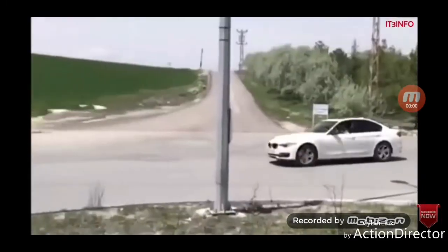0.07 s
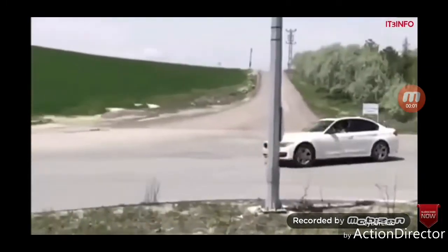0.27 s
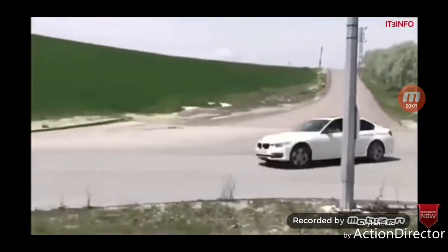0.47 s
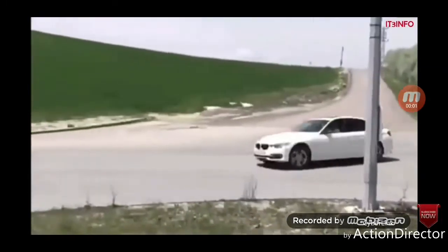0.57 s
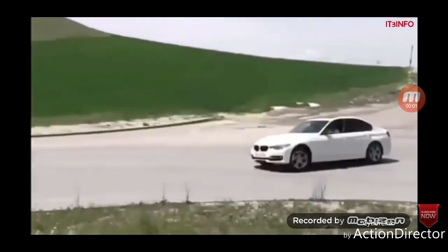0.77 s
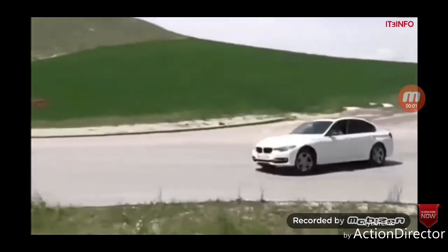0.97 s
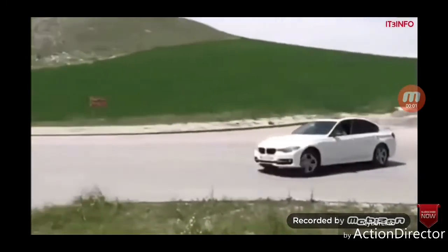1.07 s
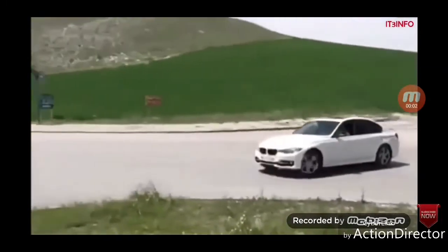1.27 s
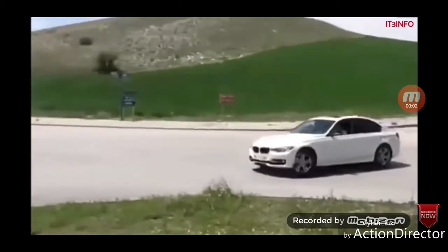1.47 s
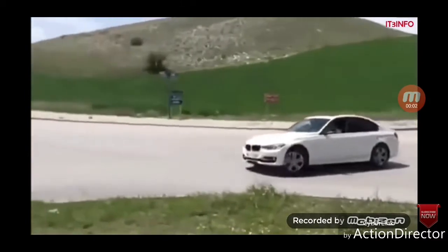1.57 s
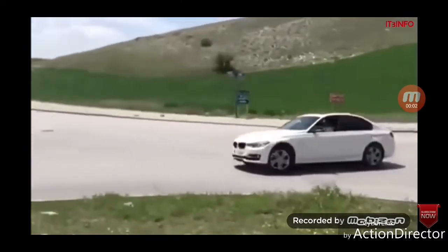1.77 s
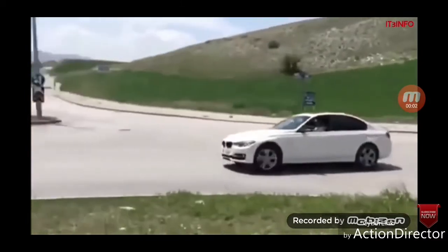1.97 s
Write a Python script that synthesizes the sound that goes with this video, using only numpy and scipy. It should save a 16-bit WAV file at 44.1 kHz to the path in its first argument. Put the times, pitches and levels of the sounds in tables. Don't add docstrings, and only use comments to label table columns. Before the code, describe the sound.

Tyres of a sliding car squeal without a break on dry asphalt, several wavering high pitches over gritty rubber scrub; outdoors, some metres from a hand-held phone, with small handling ticks, cloth rustle and low air rumble.

```python
import sys
import numpy as np
from scipy import signal
from scipy.fft import rfft, irfft
from scipy.io import wavfile
from scipy.ndimage import uniform_filter1d

SR = 44100
rng = np.random.default_rng(int(sys.argv[2]) if len(sys.argv) > 2 else 0)


def invert_db(x):
    u = np.asarray(x, float) / 20
    return 10 ** u


def wav_out(sig):
    wavfile.write(sys.argv[1], SR, np.round(np.clip(np.atleast_2d(sig).T, -1, 1) * 32767).astype(np.int16))


N = 88244

# start_s, pitch_hz, level_db
LOW_TYRE = [(0.03, 1066, -17), (0.181, 1055, 7), (0.301, 1013, -13), (0.457, 1015, 8.5), (.54, 1006, -11),
            (.75, 985, 3.5), (0.951, 999.6, -1), (1.179, 994.2, 5.5), (1.23, 923.4, -20), (1.402, 918.5, 6),
            (1.602, 902, 8), (1.702, 931.5, -12.5), (1.797, 896.6, -6), (1.899, 947, 5.5), (2, 975, 9)]
EASE_EDGE_S = 0.02


def to_rms(x, db):
    return x * invert_db(db) / np.sqrt(np.mean(x ** 2))


def colour(x, points):
    hz, db = np.array(points, float).T
    log_hz = np.log(np.arange(len(x) // 2 + 1) * SR / len(x) + 1)
    return irfft(rfft(x) * invert_db(np.interp(log_hz, np.log(hz), db)), len(x))


def noise(points, db):
    return to_rms(colour(rng.standard_normal(N), points), db)


def walk(rate_hz):
    k = max(int(SR / rate_hz), 2)
    wander = uniform_filter1d(uniform_filter1d(rng.standard_normal(N), k), k)
    return wander / wander.std()


def swell(start_s, length_s, edge_s):
    t = np.arange(N) / SR
    inside_s = np.minimum(t - start_s, start_s + length_s - t)
    return np.sin(np.pi / 2 * np.clip(inside_s / edge_s + 0.5, 0, 1)) ** 2


def rumble():
    # frequency_hz, level_db
    air_spectrum = [(24, -41), (40, -5), (54, 6), (70, -2.5), (97, 4.5), (124, -3), (257, -9), (500, -20),
                    (650, -15), (1100, -120)]
    fills_s, thin_db = 0.38, -4.5
    full = noise([(30, -20)] + list(air_spectrum) + [(700, -18), (1000, -62)], -52)
    full = full * invert_db(0.5 * walk(3.9))
    thin = colour(full, [(180, -0.5), (300, thin_db), (520, thin_db), (650, 4.5)])
    return full + (thin - full) * swell(-1, 1 + fills_s, 0.05)


def hisses():
    road = noise([(500, -14.5), (2000, -15.5), (4500, -10), (7000, -6), (9000, -26), (11000, -46)], -50)
    phone = noise([(7000, -27), (10000, -11), (15000, -3)], -66)
    return road + phone


def engine_whine():
    # start_s, pitch_hz, level_db
    whine_curve = [(0.162, 572, -67), (.22, 578, -56.5), (.58, 586, -54.5), (0.639, 590, -60.5),
                   (1.201, 617.4, -59), (1.4, 625, -65)]
    t = np.arange(N) / SR
    s, hz, db = np.array(whine_curve).T
    pitch_hz = np.interp(t, s, hz) + 3 * walk(14.7)
    return invert_db(np.interp(t, s, db) + 1.4 * walk(31)) * np.sin(2 * np.pi * np.cumsum(pitch_hz) / SR)


def handling():
    # start_s, tick_db, bump_db
    bump_events = [
        (.0275, -55, -74),
        (0.4117, -45, -46),
        (0.5575, -40, -43),
        (0.5978, -37.5, -40),
        (0.763, -44, -78),
    ]
    # start_s, length_s, level_db
    rustle_events = [(0.413, 0.069, -43.5), (0.504, 0.073, -57), (0.594, 0.025, -48), (0.703, .13, -62),
                     (0.92, 0.12, -58), (1.063, 0.069, -64), (1.162, 0.076, -54.5), (1.265, 0.11, -52.5),
                     (1.383, 0.082, -48.5), (1.524, 0.083, -57), (1.633, 0.12, -63.5), (1.776, 0.17, -57)]
    tick_s, bump_s, bump_hz = 0.0024, 0.014, 223
    t = np.arange(N) / SR
    cloth = noise([(6000, -32), (9500, -9), (12500, -5), (15500, -6)], 0) * invert_db(0.92 * walk(150))
    thud = noise([(40, -12), (bump_hz, 0), (700, -12), (2000, -40)], 0)
    rub = invert_db(-63.5) * (t > 0.4)
    for s, length_s, db in rustle_events:
        rub = rub + invert_db(db) * swell(s, length_s, 0.065)
    out = rub * cloth
    for s, tick_db, bump_db in bump_events:
        late = np.maximum(t - s, 0)
        tick = invert_db(tick_db) * np.exp(-late / tick_s) * cloth
        bump = invert_db(bump_db) * np.exp(-late / bump_s) * thud
        out = out + (t >= s) * (tick + bump)
    return out


def stack(phase, overtones_db):
    return sum(invert_db(db) * np.cos((k + 1) * phase + 0.407 * k * k) for k, db in enumerate(overtones_db))


def tyre(curve, overtones_db, wander, jitter, flutter_db, count):
    t = np.arange(N) / SR
    s, hz, db = np.array(curve, float).T
    ribs = 0
    for _ in range(count):
        pitch_hz = np.interp(t, s, hz) * (1 + wander * walk(24.54) + jitter * walk(305))
        rib = stack(2 * np.pi * np.cumsum(pitch_hz) / SR, overtones_db)
        ribs = ribs + invert_db(flutter_db * walk(29)) * rib
    return to_rms(ribs, 0) * invert_db(np.interp(t, s, db))


def tyres():
    # start_s, pitch_hz, level_db
    mid_early_curve = [(.03, 1210, -2.5), (.2, 1198, -19), (.43, 1202, -27), (.47, 1195, 3), (.53, 1229, -6),
                       (.64, 1215, 2.5), (.68, 1205, -19), (.8, 1207, -3.5), (.88, 1169, -24), (1.15, 1145, -4),
                       (1.2, 1180, -20)]
    mid_curve = [(1.24, 1160, -20), (1.275, 1135, 1), (1.31, 1125, 1), (1.35, 1103, 3), (1.39, 1095, -2),
                 (1.43, 1105, 2), (1.47, 1080, 1), (1.53, 1048, 0), (1.58, 1045, 1), (1.64, 1030, 1),
                 (1.68, 1000, 1), (1.72, 1005, -1), (1.76, 1024, 4), (1.82, 1050, 2), (1.91, 1083, 2),
                 (1.93, 1100, -23)]
    high_curve = [(.03, 1510, 1.5), (.14, 1404, -17), (.28, 1460, -7.5), (.4, 1400, -30), (.54, 1458, -5),
                  (.63, 1450, -26), (.71, 1420, -0.5), (.77, 1382, -2.5), (.92, 1350, -2.5), (1.0, 1375, 1),
                  (1.07, 1349, 1.5), (1.15, 1376, 1.5), (1.25, 1377, 5), (1.29, 1368, -32),
                  (1.56, 1298, -0.5), (1.9, 1401, -48)]
    low_overtones = [-7, -5.5, -3, -3, -9.5, -12.5, -8]
    mid_early_overtones = [4, -0.5, -7.5, -10]
    mid_overtones = [-5, 0, -11, -10, -20]
    high_overtones = [-8, -9, -11, -26]
    return (invert_db(-11) * tyre(LOW_TYRE, low_overtones, 0.009, 0.02003, 3.2, count=2)
            + invert_db(-5) * tyre(mid_early_curve, mid_early_overtones, 0.009, 0.012, 2.5, count=1)
            + invert_db(-6.5) * tyre(mid_curve, mid_overtones, 0.006, 0.018, 2.2, count=1)
            + invert_db(-8) * tyre(high_curve, high_overtones, 0.008, 0.012, 2.5, count=1))


def locked_notes():
    # start_s, length_s, pitch_hz, level_db, overtones_db
    lock_events = [(0.56, 0.052, 1130, -4.5, 11.5), (.62, 0.04, 1200, 2, 3.5),
                   (0.784, 0.063, 975, -4.5, -23), (.92, 0.046, 1100, -4.5, 8),
                   (1.695, 0.023, 1000, 2.5, -8), (1.22, 0.17, 946, 3, -12), (0.71, 0.08, 948, 1, -16),
                   (.17, .08, 1474, 5, -22), (1.48, .07, 940, 2, -8), (2, 0.028, 990, 10.5, -3),
                   (1.94, .15, 1400, 6.5, -2.5), (0.299, 0.034, 1020, -4, 5), (0.391, 0.036, 1025, -6.5, 5),
                   (0.456, 0.029, 1010, -11.5, 15), (0.337, 0.022, 1485, 6, -11),
                   (1.15, 0.092, 1000, -8, 9), (1.4, 0.072, 905, -9.5, 3), (.14, 0.081, 1065, -7.5, 8.5),
                   (.04, .1, 690, -13.5, -31), (0.082, 0.032, 3550, -3, -40),
                   (0.238, 0.028, 3560, -2.5, -40), (.415, 0.023, 3800, 0.5, -40), (1.3, .02, 3700, 7, -40),
                   (1.385, 0.046, 2400, 0, -40), (1.87, .13, 3840, 4, -40)]
    lock_overtones = [0, -14, -9.5]
    out = 0
    for s, length_s, hz, db, over_db in lock_events:
        pitch_hz = hz * (1 + 0.009 * walk(40))
        note = stack(2 * np.pi * np.cumsum(pitch_hz) / SR, [0] + [o + over_db for o in lock_overtones])
        out = out + invert_db(db) * swell(s, length_s, EASE_EDGE_S) * note
    out = out * invert_db(1.5 * walk(50))
    return colour(invert_db(-8.5) * out, [(600, 23), (800, 24), (915, 0)])


def swarm(count):
    squeak_overtones = [0, 2.5, 0.5, -7, -6.5, -21, -6]
    spread, squeak_s, longest = 0.48, 0.028, 8192
    out = np.zeros(N + longest)
    low_s, low_hz, _ = np.array(LOW_TYRE).T
    grit = np.cumsum(0.01511 * walk(405.5)) / SR
    for row in rng.random((count, 13)):
        when, pitch, long, size, glide, turn = row[:6]
        m = np.arange(int(np.clip(SR * squeak_s * (0.4 + 1.6 * long), 64, longest)))
        u = m / len(m)
        hz = 0.99 * np.interp(when * N / SR, low_s, low_hz) * (1 + spread * pitch ** 1.4)
        gliding = hz * m / SR * (1 + 0.05 * (glide - 0.5) * u)
        rough = hz * grit[int(turn * (N - longest)) + m]
        phase = 2 * np.pi * (turn + gliding + rough)
        squeak = stack(phase, np.array(squeak_overtones) + 14 * (row[6:] - 0.5))
        size_db = -3 * np.log(size + 0.04)
        at = int(when * N)
        out[at:at + len(m)] += invert_db(size_db) * u ** 0.72 * (1 - u) ** 2.12 * squeak
    return to_rms(out[:N], -2)


def scrub():
    # frequency_hz, level_db
    scrub_spectrum = [(550, -32.5), (976, -9.5), (1590, -6), (3740, -9), (4800, -10), (6900, -13.5),
                      (8200, -25)]
    raw = colour(rng.standard_normal(N), [(300, -63)] + list(scrub_spectrum) + [(12000, -48)])
    out = 0
    for hz in 500 * 2 ** np.arange(0, 4.5, 0.5):
        band_shape = [(hz / 2, -40), (hz / 2 ** 0.5, -10), (hz, 0), (hz * 2 ** 0.5, -10), (hz * 2, -40)]
        out = out + colour(raw, band_shape) * invert_db(1.75 * walk(38))
    return to_rms(out, -11.5)


def grab_gain_db():
    # start_s, jump_db, decay_s
    grab_events = [(.243, 4, 0.04), (0.3003, 6, 0.017), (0.394, 4, 0.027), (.452, 3.5, 0.051),
                   (.558, 3, .02), (.586, 2, .04), (.672, 2.5, 0.022), (0.946, 4.5, 0.011),
                   (1.76, 3.5, 0.012), (1.792, 0.5, 0.021), (1.835, 4.5, 0.019)]
    dip_s, dip_share, rise_s = 0.0053, 0.45, 0.004
    t = np.arange(N) / SR
    out = 0
    for s, jump_db, decay_s in grab_events:
        gap = np.abs(t - s)
        out = out + jump_db * np.where(t >= s, np.exp(-gap / decay_s), -dip_share * np.exp(-gap / dip_s))
    return uniform_filter1d(out, int(rise_s * SR))


def slide():
    # start_s, level_db, brightness_db, swarm_db
    load_curve = [(0.03, -25.5, -44, -3.5), (0.122, -25.5, -23.5, -1.5), (0.178, -23.5, -26.5, -4.5),
                  (.29, -21, -22.5, -2.5), (.44, -19.5, -20.5, -1), (0.584, -17.5, -17, -1),
                  (0.672, -17.5, -21.5, -0.5), (.95, -18, -20, 0.5), (1.05, -19, -19.5, -1),
                  (1.25, -18.5, -19, -0.5), (1.499, -19.5, -16.5, -4), (1.7, -20.5, -16, -1),
                  (1.85, -23.5, -13.5, -0.5), (2.0, -21.5, -16, -0.5)]
    # frequency_hz, gain_db
    arch_colour = [(1480, 1.5), (1680, 0.5), (1900, 1), (2900, -1.5), (3200, -4.5), (3550, 5), (4000, 2),
                   (4800, -0.5)]
    # start_s, length_s, treble_db
    ease_events = [
        (.19, .045, -9),
        (.385, .01, -6),
        (1.01, .06, -7),
        (1.02, .03, -6),
        (1.84, .02, -5),
    ]
    grip_lost_s = 0.0282
    t = np.arange(N) / SR
    s, db, bright_db, swarm_db = np.array(load_curve, float).T
    squeal = tyres() + locked_notes() + invert_db(np.interp(t, s, swarm_db)) * swarm(count=700)
    squeal = colour(squeal, [(830, -34), (915, -1), (7000, -1.5), (8500, -24.5), (11000, -21)])
    rubber = colour(squeal + scrub(), arch_colour)
    treble = colour(rubber, [(2400, -28), (3800, -5), (5000, 2)])
    treble_db = np.interp(t, s, bright_db) + 16
    for start_s, length_s, ease_db in ease_events:
        treble_db = treble_db + ease_db * swell(start_s, length_s, EASE_EDGE_S)
    rubber = rubber + treble * (invert_db(treble_db) - 1)
    load_db = np.interp(t, s, db) + grab_gain_db() + 0.14 * walk(31)
    return rubber * invert_db(load_db) * swell(grip_lost_s, 5, 0.0014)


def scene():
    mix = rumble() + hisses() + engine_whine() + handling() + slide()
    return mix[None, :]


def band_limit(x):
    return signal.sosfilt(signal.butter(12, 15560, fs=SR, output="sos"), x)


def record(dry):
    return band_limit(dry)


dry = scene()
out = record(dry)
wav_out(out)
```